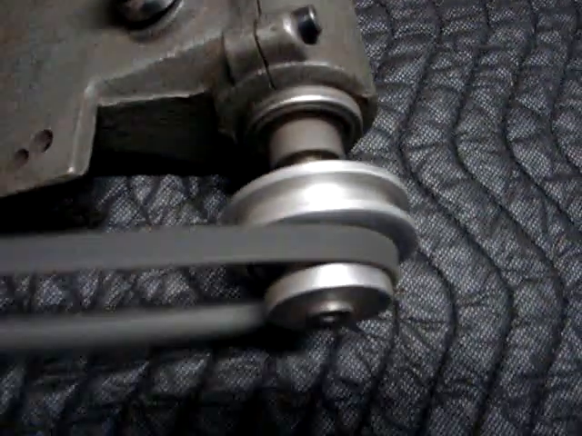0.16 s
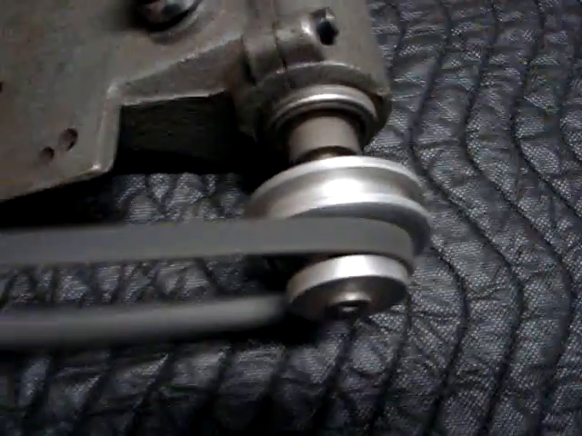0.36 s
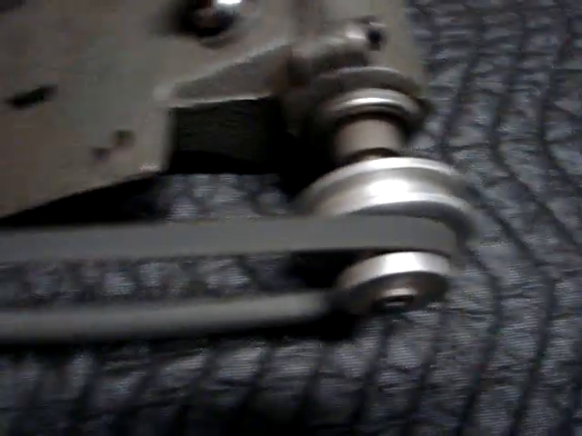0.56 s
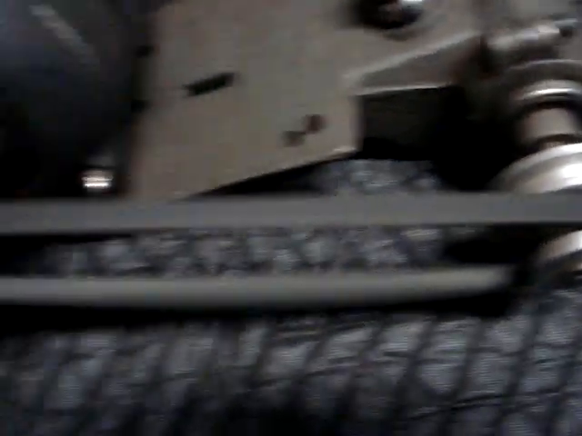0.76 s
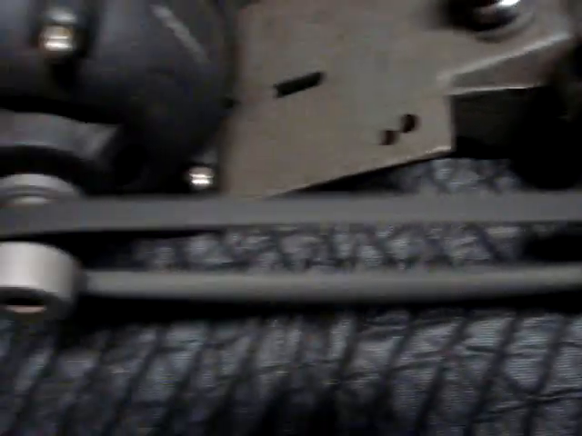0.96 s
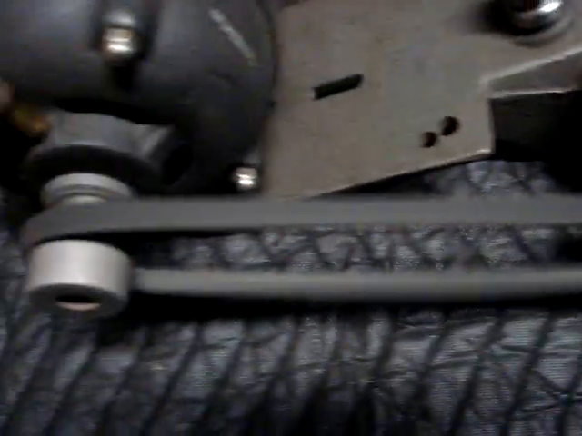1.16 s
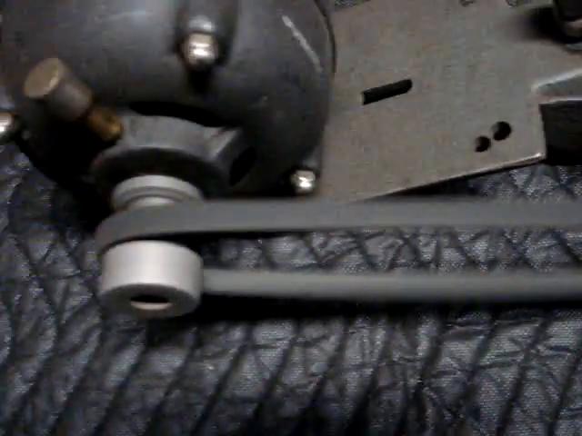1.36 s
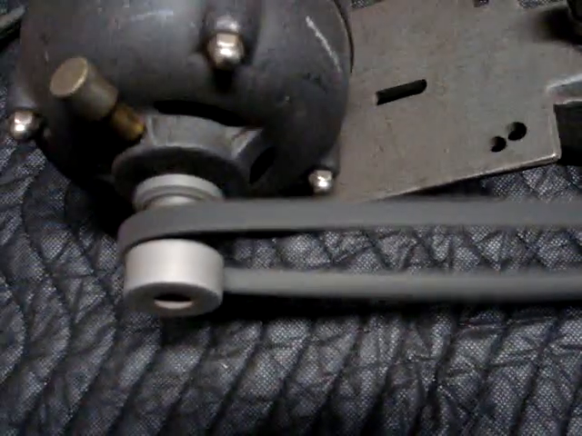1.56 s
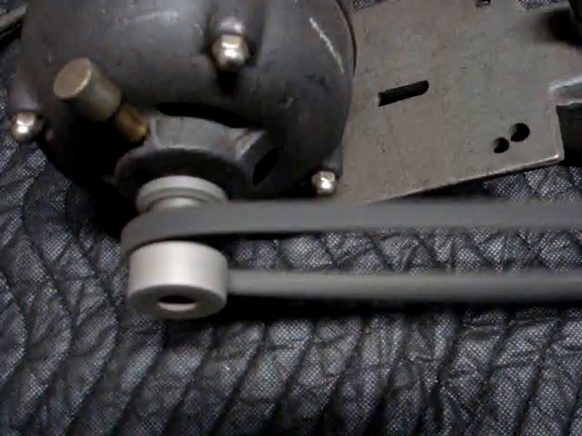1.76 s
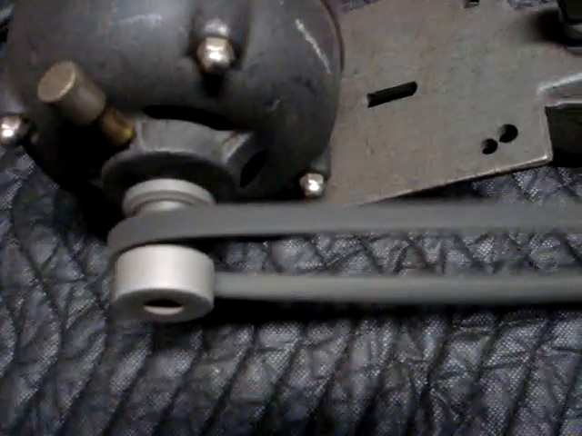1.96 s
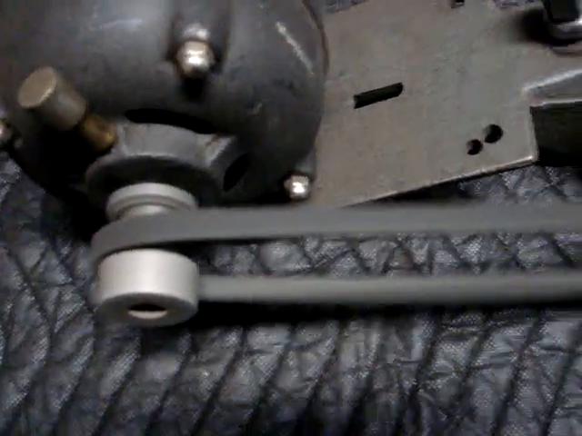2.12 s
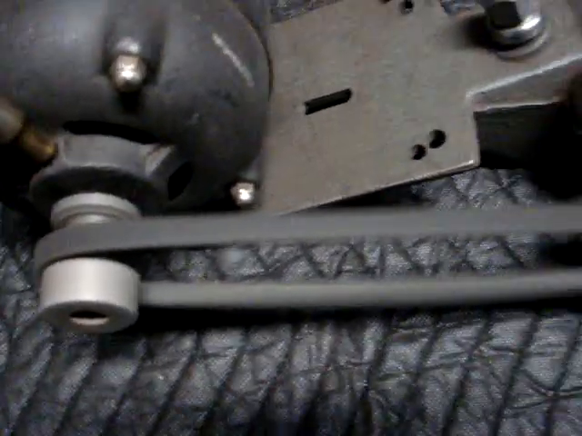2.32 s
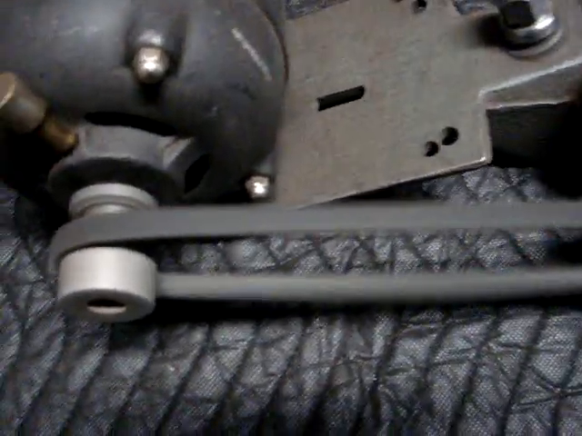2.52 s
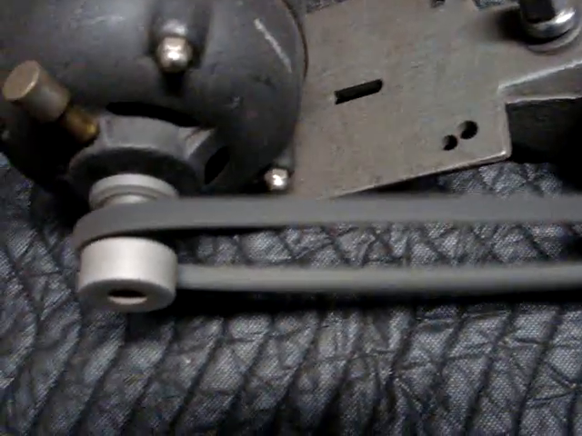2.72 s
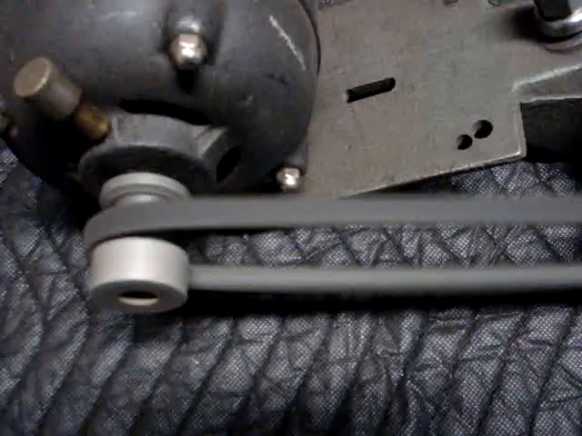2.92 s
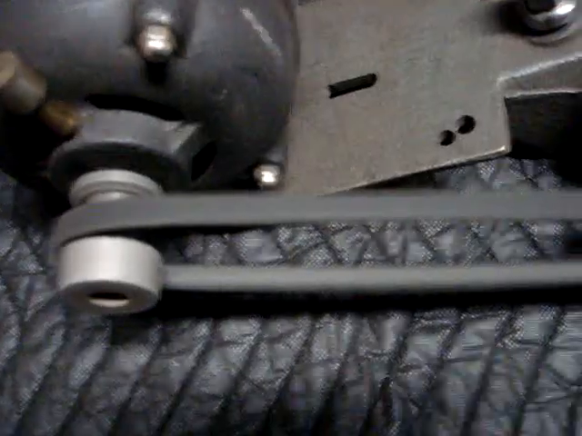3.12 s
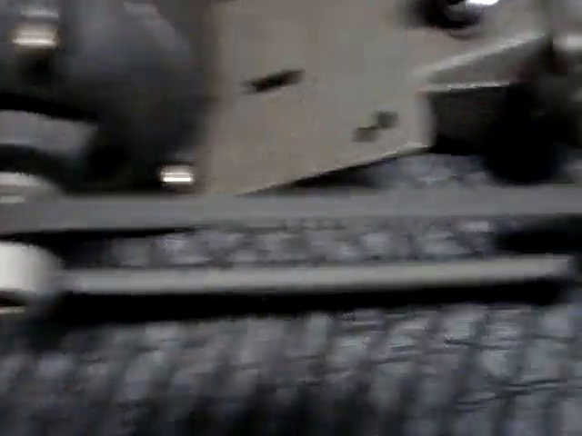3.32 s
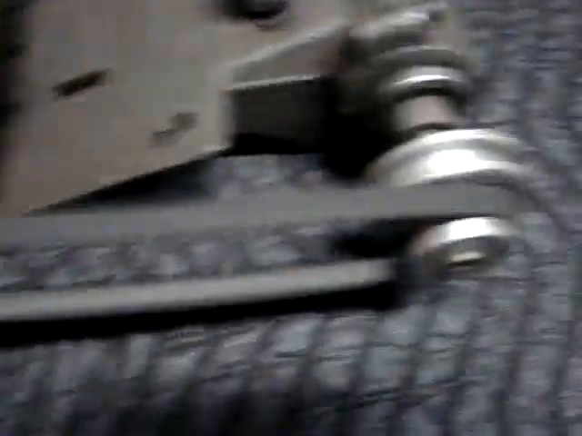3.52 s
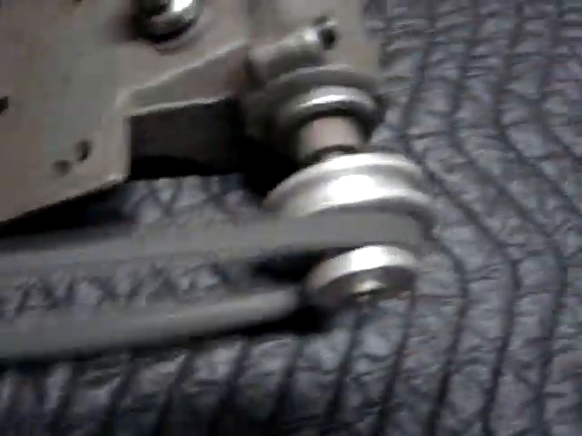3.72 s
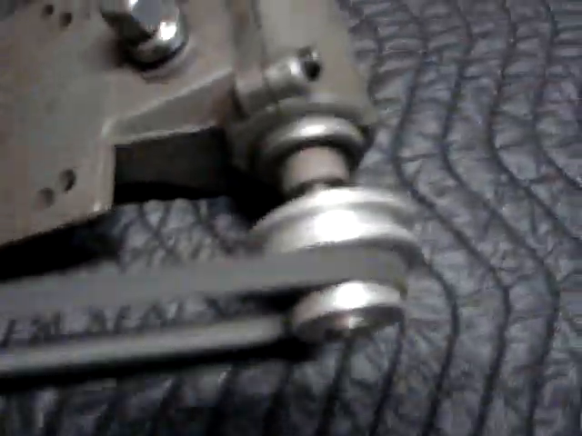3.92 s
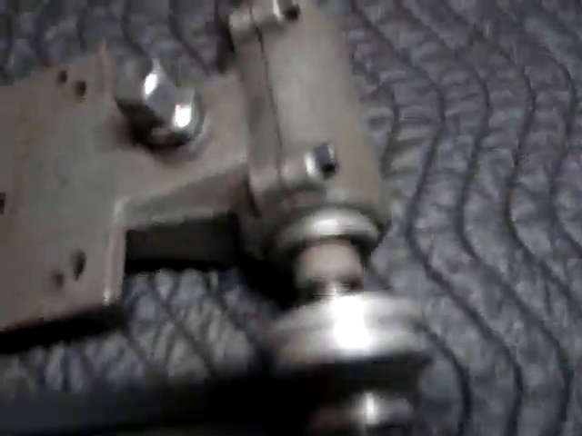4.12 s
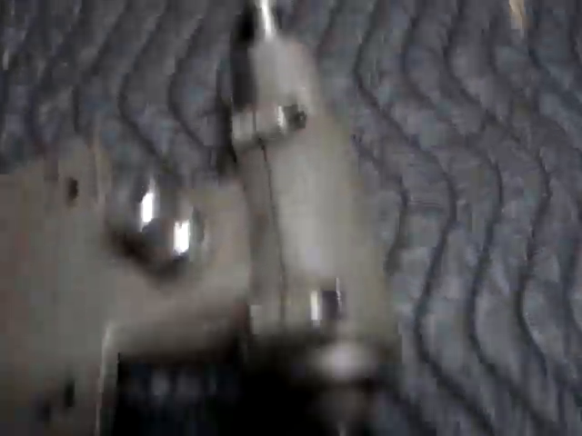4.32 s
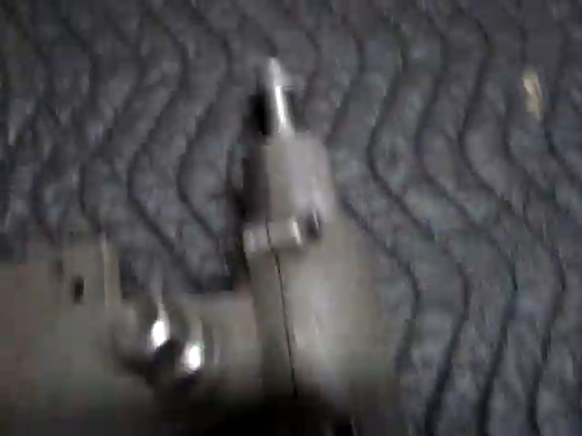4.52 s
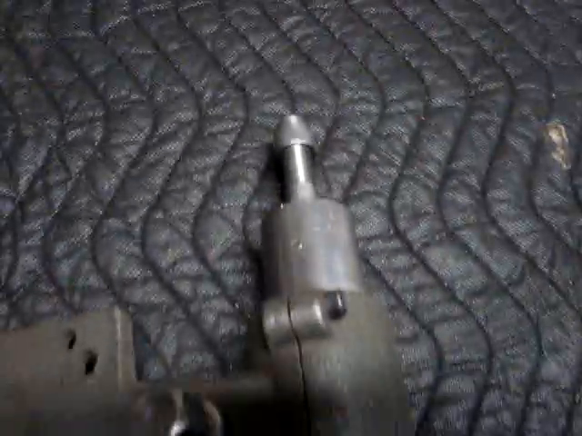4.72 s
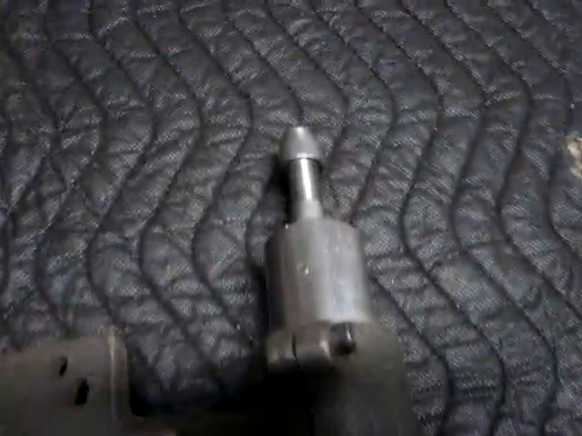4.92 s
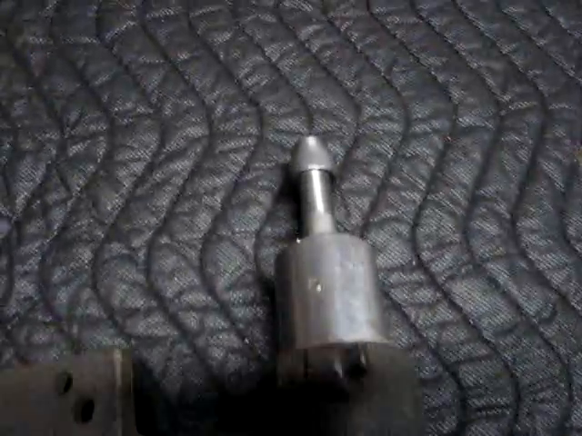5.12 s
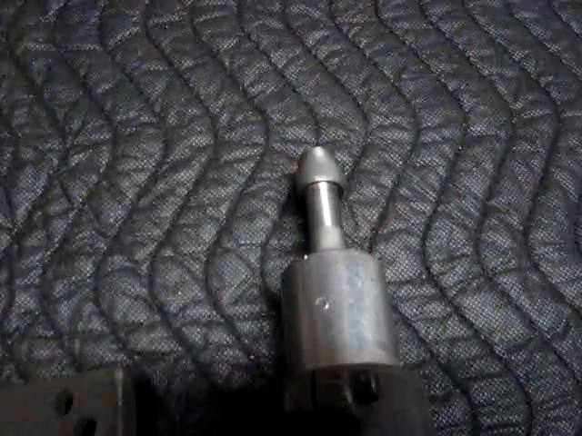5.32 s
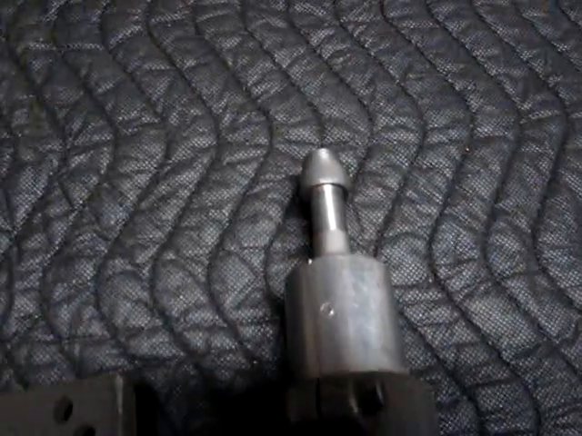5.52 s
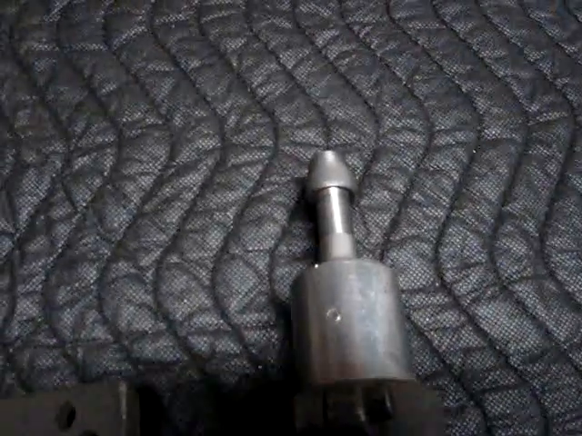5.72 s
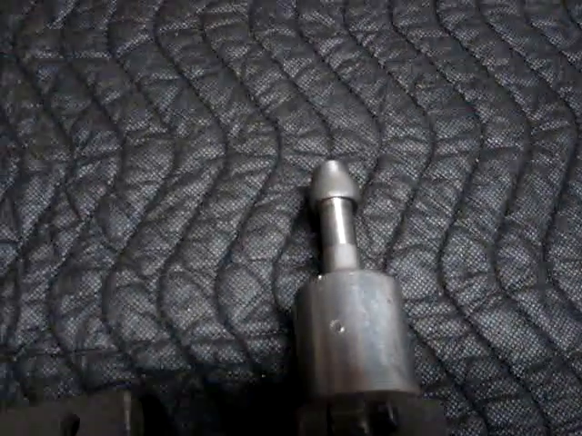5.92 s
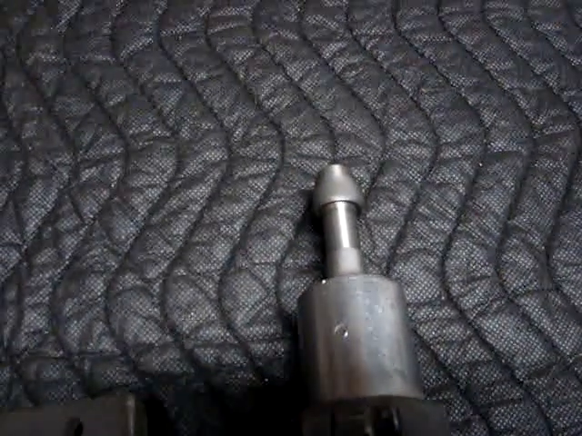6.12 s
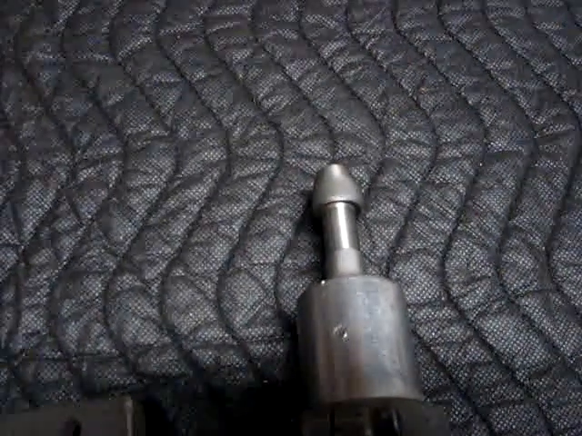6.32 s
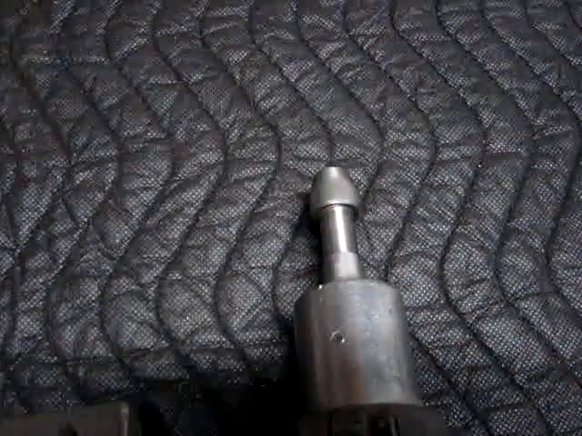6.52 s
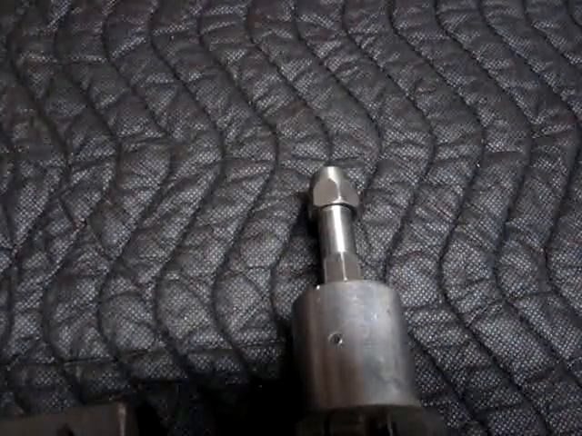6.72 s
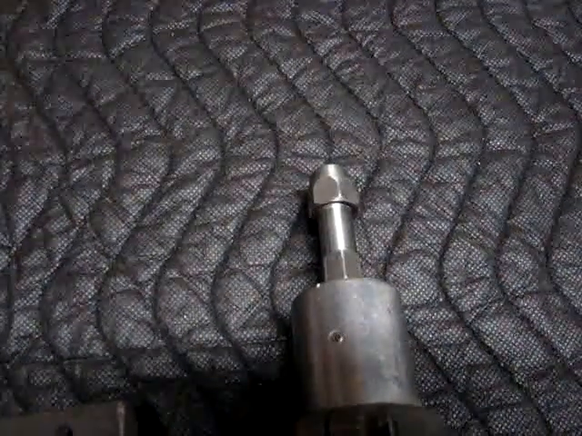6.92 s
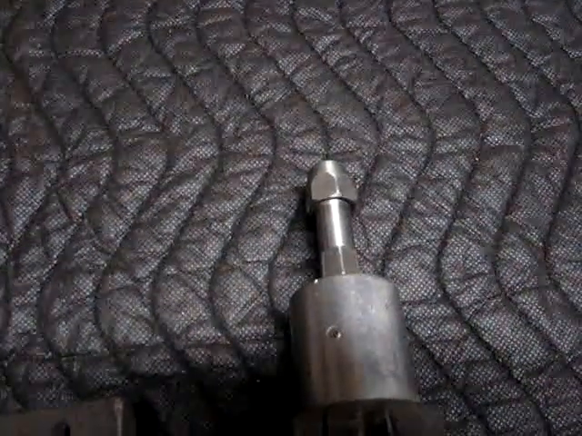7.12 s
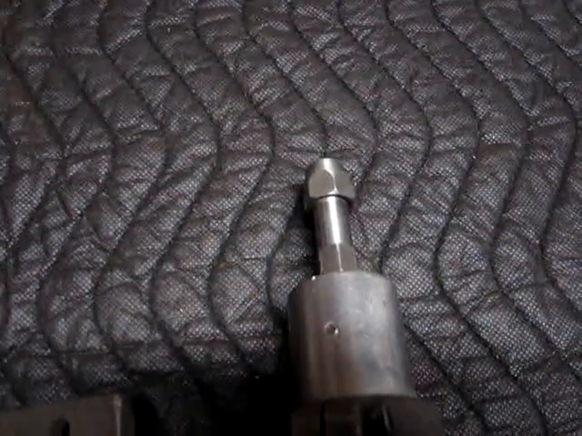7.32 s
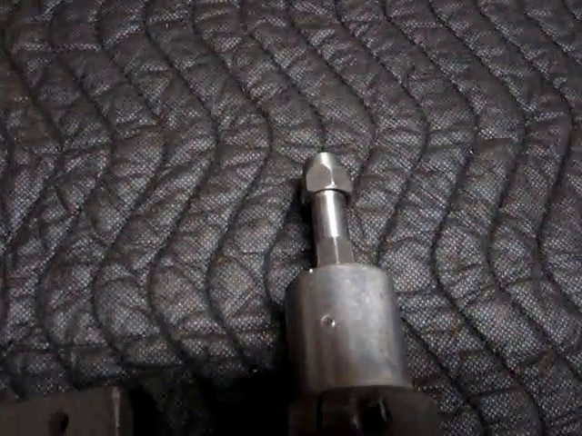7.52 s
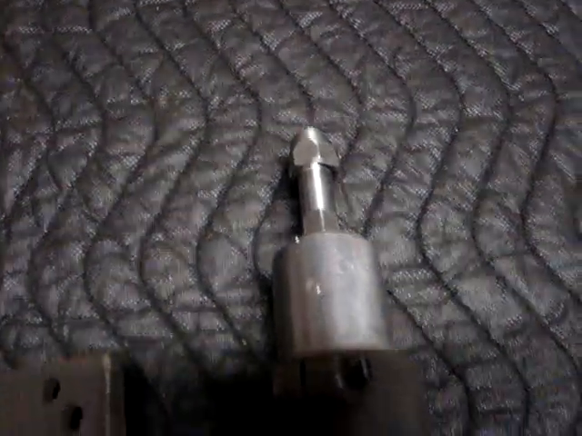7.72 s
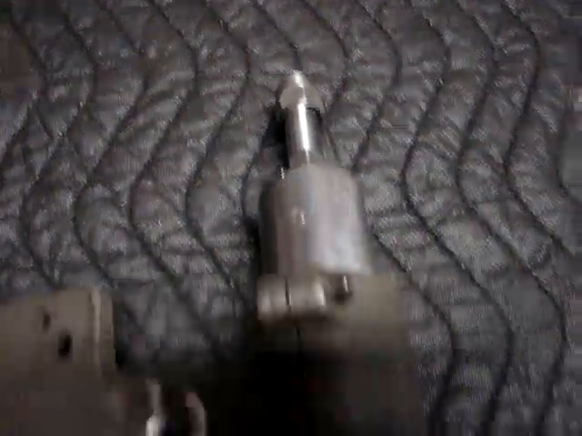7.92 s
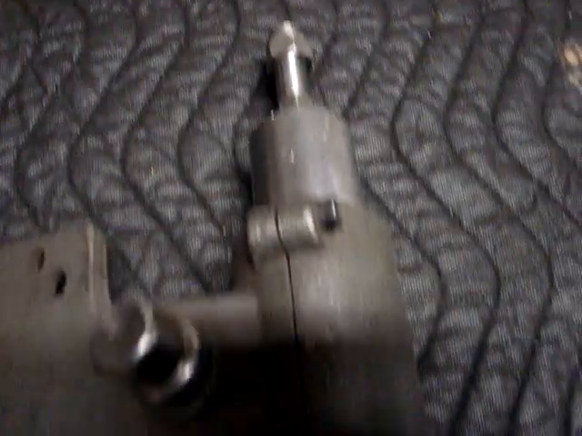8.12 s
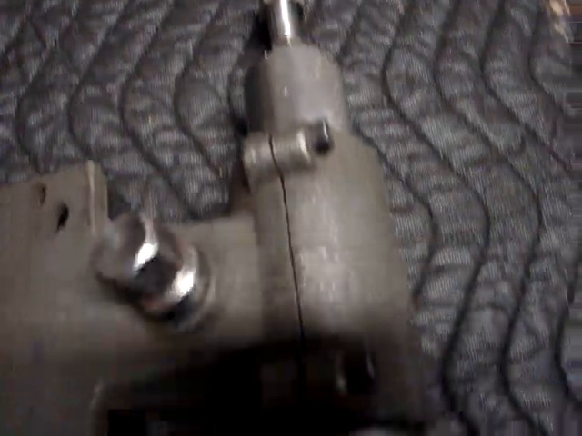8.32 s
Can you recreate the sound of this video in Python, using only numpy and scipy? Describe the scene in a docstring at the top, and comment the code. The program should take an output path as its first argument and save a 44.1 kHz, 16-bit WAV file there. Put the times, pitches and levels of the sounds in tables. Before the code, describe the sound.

Close, mono sound of a running grinder spindle: a broad rush of air, piercing whine and gritty bearing hiss, with more vent noise as the microphone nears the motor. Power is cut and the pitch slides steadily downward, ringing through the metal castings. Near the spindle nose, a dry rattle slows into small scraping catches, then stops. Only low workshop air and dull hand rumbles on the microphone remain.

```python
"""A whining, rushing grinder motor drives a spindle through a flat belt, on a blanket in a workshop.
Switched off, it coasts to a stop: bearing whines (tones locked to the shaft) glide down through casting
resonances, the rush of air (coloured noise) fades, the bearings (noise under uneven pressure) rattle to rest.
Levels follow shaft speed and the microphone, which moves from motor to spindle nose and has gain control."""
import sys
import numpy as np
from scipy import signal
from scipy.fft import rfft, irfft, next_fast_len
from scipy.io import wavfile
from scipy.ndimage import uniform_filter1d

SR = 44100
rng = np.random.default_rng(int(sys.argv[2]) if len(sys.argv) > 2 else 0)


def file_out(sig):
    """Save sig as 16-bit WAV at sys.argv[1]."""
    # one column per channel
    cols = np.atleast_2d(sig).T
    # limit, then scale
    lim = np.clip(cols, -1, 1)
    pcm = np.round(lim * 32767).astype(np.int16)
    wavfile.write(sys.argv[1], SR, pcm)


N = 373527
TIME_S = np.arange(N) / SR
# all levels are before gain control


def from_db(db):
    """Decibels to amplitude gain."""
    return 10 ** (np.asarray(db) / 20)


def rms_one(x):
    """Scale to unit power."""
    return x / np.sqrt(np.mean(x ** 2) + 1e-20)


def in_time(rows):
    """Each column of a curve, interpolated at every sample."""
    time_s, *columns = np.transpose(rows)
    return [np.interp(TIME_S, time_s, column) for column in columns]


def drift(cycles):
    """Random curve of spread about 1, with a new knot at each whole cycle."""
    knots = rng.standard_normal(N // 10)
    # 1.2 restores the spread lost between knots
    return 1.2 * np.interp(cycles, np.arange(len(knots)), knots)


def noise(spectrum):
    """Unit-power noise of a given colour, interpolated over log frequency."""
    size = next_fast_len(N)
    pitch_hz, level_db = np.transpose(spectrum)
    bins_hz = np.maximum(np.fft.rfftfreq(size, 1 / SR), 1)
    colour = from_db(np.interp(np.log(bins_hz), np.log(pitch_hz), level_db))
    white = rfft(rng.standard_normal(size))
    return rms_one(irfft(white * colour, size)[:N])


def high_pass(x, hz, order):
    """Cut the bass with a Butterworth filter."""
    return signal.sosfilt(signal.butter(order, hz, "high", fs=SR, output="sos"), x)


def resonate(force, modes):
    """Each resonance lifts the vibration near its pitch and rings on a little."""
    sections = []
    for pitch_hz, width_hz, lift_db in modes:
        gain = from_db(lift_db / 2)   # half in the zeros, half in the poles
        damping = np.pi * width_hz / SR
        turn = -2 * np.cos(2 * np.pi * pitch_hz / SR)
        zeros = [1 + damping * gain, turn, 1 - damping * gain]
        poles = [1 + damping / gain, turn, 1 - damping / gain]
        sections.append(np.divide(zeros + poles, poles[0]))
    return signal.sosfilt(sections, force)


def tone(cycles, fluctuations, loose):
    """A unit-power sine of which a share, loose, wanders in strength and phase."""
    phase = (2 * np.pi * (cycles - np.floor(cycles))).astype("float32")
    firm, shaky = np.sqrt(2 * (1 - loose)), np.sqrt(loose)
    in_phase = firm + shaky * drift(fluctuations)
    quadrature = shaky * drift(fluctuations)
    return in_phase * np.sin(phase) + quadrature * np.cos(phase)


# shaft speed before coasting losses: time_s, speed_turns_per_s
POWERED_SPEED = [(0, 140.0), (.4, 140.1), (1.6, 141.4), (2.55, 141.7)]
OFF_S, STOP_S = 2.55, 6.786
AIR_SHARE, AIR_POWER = .19, 2.91   # of the coasting curve


def shaft_speed():
    """Turns per second: powered curve, then slowed by friction and air drag."""
    left = np.clip((STOP_S - TIME_S) / (STOP_S - OFF_S), 0, 1)
    coast = (1 - AIR_SHARE) * left + AIR_SHARE * left ** AIR_POWER
    return in_time(POWERED_SPEED)[0] * coast


# microphone path: time_s, motor_nearness_0_to_1, nose_nearness_0_to_1
MICROPHONE_PATH = [(0, 0, 0), (.6, 0.67, 0.05), (1.25, 1, 0.08), (2.85, 1, 0.07), (3.65, 0.06, 0.05),
                   (4.3, 0, 0.48), (5, 0, 0.84), (5.6, 0.4, 0.97)]
# how each sound follows shaft and microphone:
# full_speed_db, knee_turns_per_s, speed_power (below knee), motor_db (added there), nose_db (added there)
SPEED_LAWS = {"rush": (-18, 154, 3.5, -3, 5), "vents": (-41.5, 148, 1, 17.5, -3),
              "rattle": (-40.5, 22, 3.04, 5.5, 13), "hiss": (-34, 38, 3.5, 0.9, 3.5),
              "whine": (-2, 27, 3.5, 1.5, 0), "drag": (-37, 9, 2, 0, 0.5)}


def strength(name, speed):
    """Gain: a power of the speed that levels off above a knee, changed by microphone nearness."""
    full_speed_db, knee, power, motor_db, nose_db = SPEED_LAWS[name]
    at_motor, at_nose = in_time(MICROPHONE_PATH)
    drive = speed / np.hypot(speed, knee)
    level_db = full_speed_db + motor_db * at_motor + nose_db * at_nose
    return from_db(level_db) * (drive / drive.max()) ** power


# air noise colours: pitch_hz, level_db_per_hz (relative)
RUSH_COLOUR = [(30, -47), (100, -53), (250, -25.5), (400, -11.5), (500, -3), (640, 7), (900, 1), (1250, 1),
               (1750, -3.5), (2000, -5), (2900, -9), (3400, -10.5), (10000, -19.5)]
VENT_COLOUR = [(900, -36), (1350, -5.5), (1550, 0), (1780, -2.5), (2100, -12), (3000, -7), (4500, -30.5)]


def air_rush(speed, pressure):
    """Broad air noise and vent noise, breathing with the square root of bearing pressure."""
    rush = strength("rush", speed) * noise(RUSH_COLOUR)
    vents = strength("vents", speed) * noise(VENT_COLOUR)
    return (rush + vents) * np.sqrt(pressure)


# unbalance: order_cycles_per_turn, level_db (at the rocking resonance)
UNBALANCE_ORDERS = [(1, -61), (1.18, -56), (2, -64.5), (2.36, -69.5), (3, -68)]


def hum(speed, turns, rocking_hz, width_hz):
    """Unbalance rocks the machine on its soft bed, most when it passes the rocking pitch."""
    out = 0
    for order, level_db in UNBALANCE_ORDERS:
        detuning = 2 * (order * speed - rocking_hz) / width_hz
        out = out + from_db(level_db) * tone(order * turns, turns / 8, .28) / np.hypot(1, detuning)
    return out * np.minimum(speed / 40, 1)


# squeals of skidding balls: order_cycles_per_turn, fluctuations_per_turn, level_db (relative)
SQUEAL_ORDERS = [(71.3, 3, 0), (81.5, 9, -2), (91.7, 10, -3), (108, 12, -11)]
SQUEAL_POWERED_DB, SQUEAL_COASTING_DB = -42, -37.5   # before the whine law


def squeals(turns, powered, coasting):
    """Skidding balls squeal in shaft-locked tones that wander almost wholly."""
    out = 0
    for order, fluctuations, level_db in SQUEAL_ORDERS:
        out = out + from_db(level_db) * tone(order * turns, fluctuations * turns, 0.99)
    level = from_db(SQUEAL_POWERED_DB) * powered + from_db(SQUEAL_COASTING_DB) * coasting
    return high_pass(out, 2600, order=4) * level


# inner race turns, adding a sideband each side; levels before the whine law
OUTER_DB, INNER_DB, DB_PER_OCTAVE, LOADED_DB = -47, -44, -3, -8.5   # loaded: added under power
LOWER_DB, UPPER_DB = -13.5, -6.5


def series(passes_per_turn, first, last, first_db):
    """Harmonics of a ball-pass rate: (cycles per turn, dB)."""
    return [(passes_per_turn * k, first_db + DB_PER_OCTAVE * np.log2(k / first))
            for k in range(first, last + 1)]


def race_tones():
    """Balls passing flaws in the races: (cycles per turn, dB under power, dB coasting)."""
    tones = series(2.535, 4, 9, OUTER_DB)   # outer race
    for order, level_db in series(5.14, 4, 12, INNER_DB):
        for shift, side_db in [(-1, LOWER_DB), (0, 0), (1, UPPER_DB)]:
            tones.append((order + shift, level_db + side_db))
    return [(order, level_db + LOADED_DB, level_db) for order, level_db in tones]


# rotor and pulley tones, before the whine law: order_cycles_per_turn, powered_db, coasting_db
ROTOR_TONES = [(5.71, -60, -45), (6.57, -60, -43), (6.86, -60, -43), (7.59, -45, -55), (10.58, -40, -51),
               (11.02, -42, -44), (12.7, -43, -50), (15.97, -34.5, -47), (16.33, -48, -49),
               (25.87, -41, -49), (26.85, -42.5, -50), (30.87, -48, -52), (32.12, -46.5, -54),
               (34.98, -45.5, -44), (40, -56, -47), (59.7, -46.5, -60)]
# bearing seat resonances: pitch_hz, width_hz, lift_db
SEAT_MODES = [(658, 130, 7), (1090, 140, 7), (1650, 630, 3), (2400, 430, -4), (4510, 510, 3.5),
              (5800, 1100, -3), (6540, 390, 9)]
UNLOAD_S = .25   # bearings unload after switch-off
LOOSE_POWERED, LOOSE_COASTING = 0.056, 0.41   # share of each tone that wanders
SWELL_DB, SWELLS_PER_S = 2, 3


def whines(turns):
    """Shaft-locked tones, clean under power, fitful coasting; a steep bass cut keeps out low rumble."""
    coasting = np.clip((TIME_S - OFF_S) / UNLOAD_S, 0, 1)
    powered = 1 - coasting
    loose = np.clip(LOOSE_POWERED * powered + LOOSE_COASTING * coasting, 0, 1)
    out = squeals(turns, powered, coasting)
    for order, powered_db, coasting_db in ROTOR_TONES + race_tones():
        level = from_db(powered_db) * powered + from_db(coasting_db) * coasting
        swell = from_db(SWELL_DB * drift(SWELLS_PER_S * TIME_S))   # separate for each tone
        out = out + level * tone(order * turns, turns / 2, loose) * swell
    return high_pass(resonate(out, SEAT_MODES), 516, order=10)


def rolling(speed, turns):
    """Contact pressure in the bearings: lumpier as they slow, swelling with each round of the belt."""
    slow = 1 - speed / speed.max()
    belt_db = 0.44 * slow * np.sin(2 * np.pi * 0.22 * turns)
    lumps_db = (0.73 + 0.39 * slow) * drift(140 * TIME_S)
    return from_db(belt_db + lumps_db)


# bearing noise colours: pitch_hz, level_db_per_hz (relative)
RATTLE_COLOUR = [(60, -44), (250, -19), (450, -12.5), (600, -5.5), (850, -18), (1100, -0.5), (1400, 5.5),
                 (2000, -0.5), (2600, -3), (4200, -9.5), (7700, -28), (10000, -17)]
HISS_COLOUR = [(200, -33), (1500, -27), (3000, -9), (4300, -1.5), (5500, 0), (7000, 2), (8800, -0.5),
               (10000, -5.5)]


def bearing_noise(speed, pressure):
    """Rattle and hiss follow contact pressure; tiny pits in the races make the hiss gritty."""
    grit = rms_one(from_db(1.9 * drift(1500 * TIME_S)))
    rattle = strength("rattle", speed) * noise(RATTLE_COLOUR)
    hiss = strength("hiss", speed) * noise(HISS_COLOUR) * grit
    return (rattle + hiss) * pressure


# balls catching in the last turns: start_s, level_db (at onset, before the castings)
BALL_CATCHES = [(6.14, -35), (6.162, -53), (6.246, -36), (6.302, -37), (6.388, -53), (6.486, -40),
                (6.573, -52)]
# drag noise colour: pitch_hz, level_db_per_hz (relative)
DRAG_COLOUR = [(300, -35), (620, -9.5), (850, -10), (1020, -3.5), (1170, -0.5), (1500, -5.5), (3000, -28.5)]
OIL_FILM_TURNS_PER_S = 38.3   # above this, oil lifts the balls and drag dies away


def catches(speed, decay_s):
    """The slow bearings drag with a dull scrape that flares each time a ball catches."""
    bursts = 0
    for start_s, level_db in BALL_CATCHES:
        decay = np.exp(-np.abs(TIME_S - start_s) / decay_s)
        bursts = bursts + from_db(level_db) * decay * (TIME_S >= start_s)
    drag = strength("drag", speed) / (1 + (speed / OIL_FILM_TURNS_PER_S) ** 4)
    return (drag + bursts) * noise(DRAG_COLOUR)


# hand bumps on the microphone: centre_s, half_length_s (to 1/e), level_db (added amplitude)
HAND_BUMPS = [(7.05, 0.027, -78), (7.18, .03, -71), (7.617, .06, -68), (8.04, .05, -74), (8.33, .07, -75)]
# noise colours: pitch_hz, level_db_per_hz (relative)
ROOM_COLOUR = [(30, -24), (54, -31.5), (90, -11), (126, -6.5), (317, -4.5), (673, -7), (994, -9.5),
               (3600, -18), (10000, -25), (13000, -59)]
RUMBLE_COLOUR = [(30, -30), (60, -14), (85, -11), (115, 5.5), (140, 11), (175, -18.5), (260, -11.5),
                 (500, -43)]
ROOM_DB, RUMBLE_DB = -63.5, -77.5


def workshop():
    """Room air noise, and the rumble of the hand on the microphone swelling at each bump."""
    bumps = 0
    for centre_s, half_length_s, level_db in HAND_BUMPS:
        bumps = bumps + from_db(level_db) * np.exp(-((TIME_S - centre_s) / half_length_s) ** 2)
    room = from_db(ROOM_DB) * noise(ROOM_COLOUR)
    return room + (from_db(RUMBLE_DB) + bumps) * noise(RUMBLE_COLOUR)


# casting resonances: pitch_hz, width_hz, lift_db
CASTING_MODES = [(602, 180, 10), (1028.4, 41, 12), (1158, 89, 17), (1636, 55, 7.5), (2160, 144, 4),
                 (2400, 180, 12), (2750, 93, 7.5), (3450, 230, 3.5), (4212, 384, 10), (4840, 770, 8.5),
                 (5590, 250, 7), (6210, 600, 7), (6990, 360, 4), (7370, 220, 6), (8590, 570, 5),
                 (9620, 136, 10.5)]


def scene():
    """Bearing forces ring the castings; air, hum and workshop join, the same in both ears."""
    speed = shaft_speed()
    turns = np.cumsum(speed) / SR
    pressure = rolling(speed, turns)
    force = bearing_noise(speed, pressure)
    force = force + strength("whine", speed) * whines(turns)
    force = force + catches(speed, decay_s=0.0055)
    machine = air_rush(speed, pressure) + resonate(force, CASTING_MODES)
    machine = machine + hum(speed, turns, rocking_hz=131.2, width_hz=10.3)
    return np.tile(high_pass(machine, 80, order=2) + workshop(), (2, 1))


HELD_DB, MOST_GAIN_DB, RECOVERY_DB_PER_S, AVERAGING_S = -18, 12.5, 4, .15
CUTOFF_HZ = 10050


def record(dry):
    """Gain control holds the level and creeps back up as the sound fades; the top is cut steeply."""
    power = uniform_filter1d(dry[0] ** 2, int(AVERAGING_S * SR))
    level_db = 10 * np.log10(power + 1e-12)
    recovery_db = RECOVERY_DB_PER_S * TIME_S
    remembered_db = np.maximum.accumulate(level_db + recovery_db) - recovery_db
    held = dry * from_db(np.minimum(HELD_DB - remembered_db, MOST_GAIN_DB))
    low_pass = signal.ellip(12, .1, 80, CUTOFF_HZ, fs=SR, output="sos")
    return signal.sosfilt(low_pass, held)


dry = scene()
out = record(dry)
file_out(out)
```